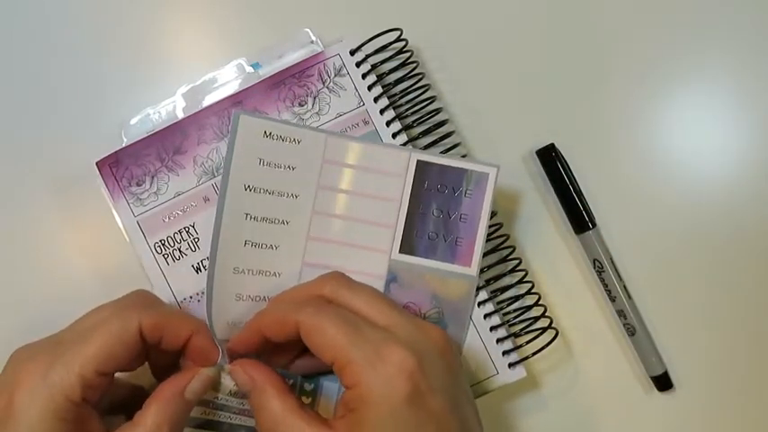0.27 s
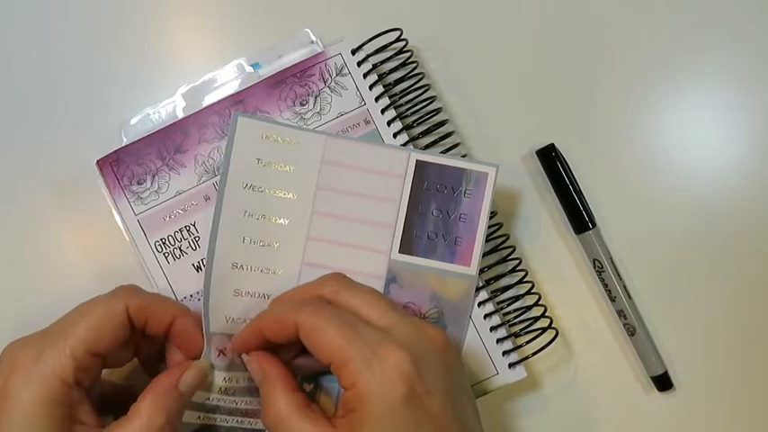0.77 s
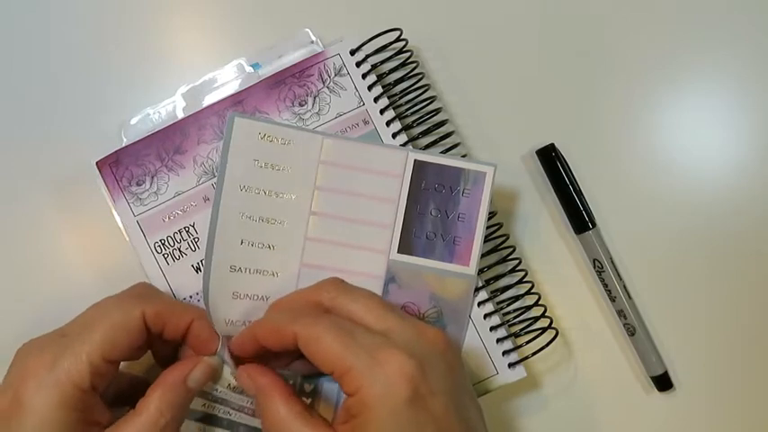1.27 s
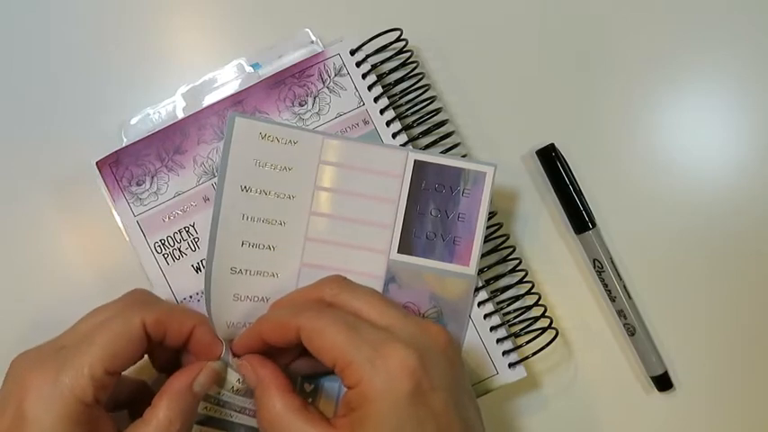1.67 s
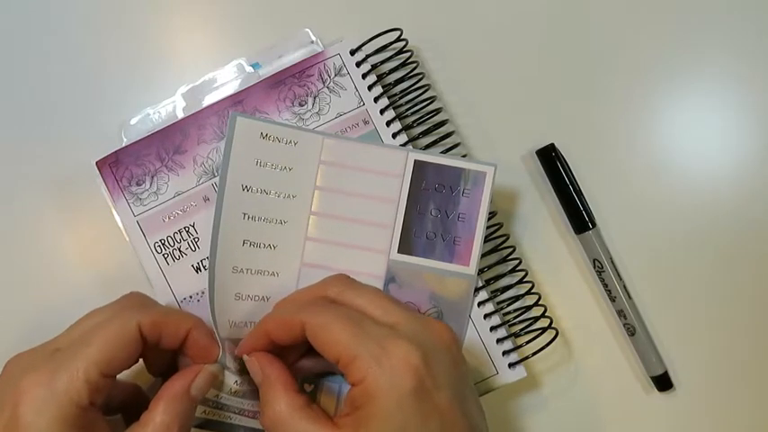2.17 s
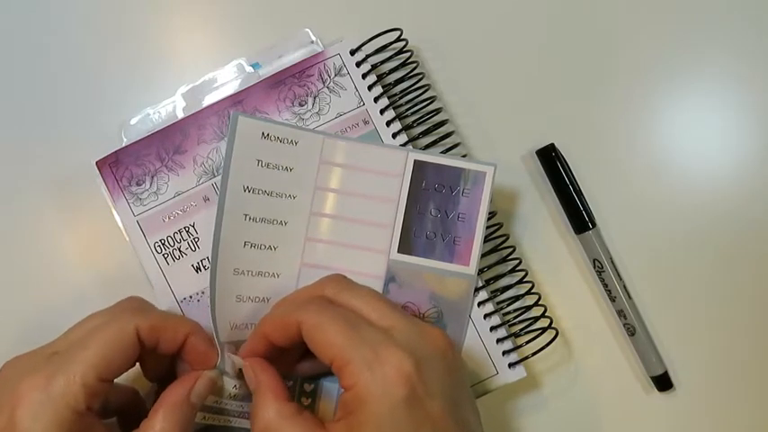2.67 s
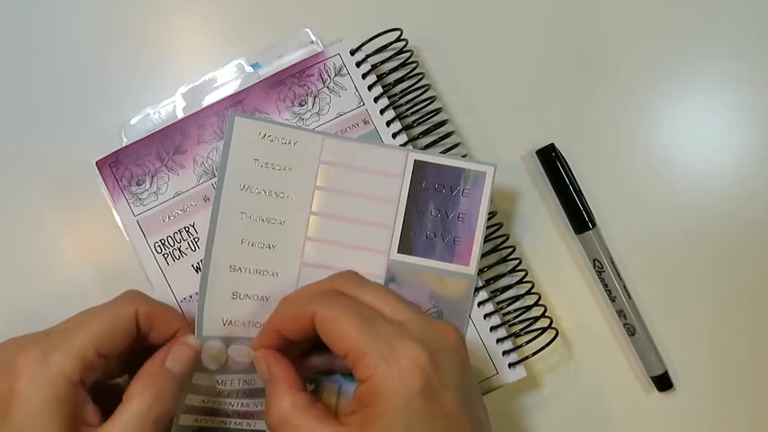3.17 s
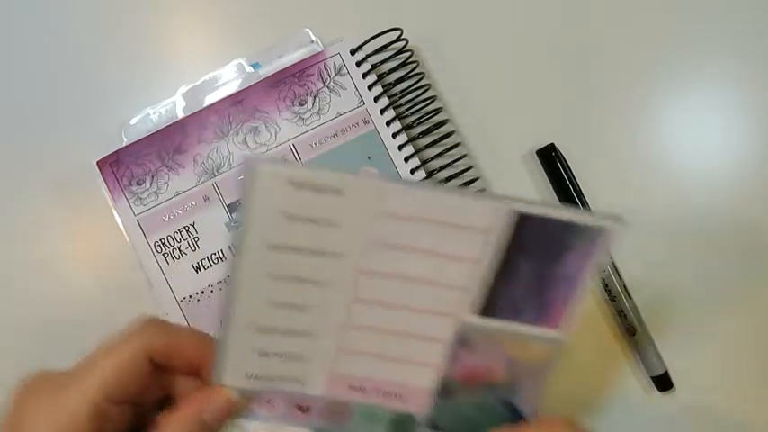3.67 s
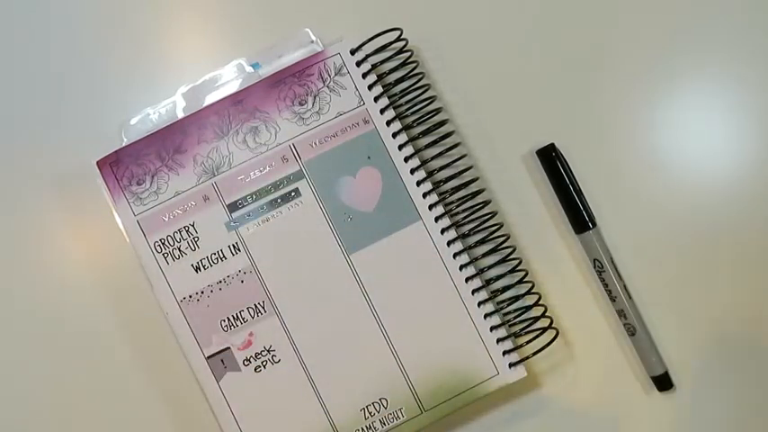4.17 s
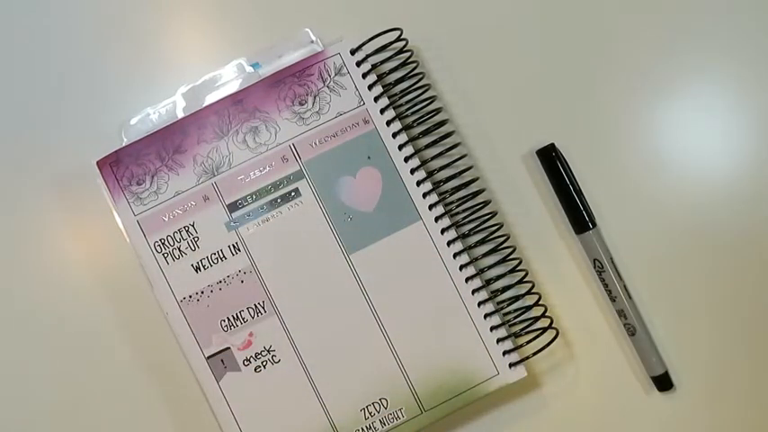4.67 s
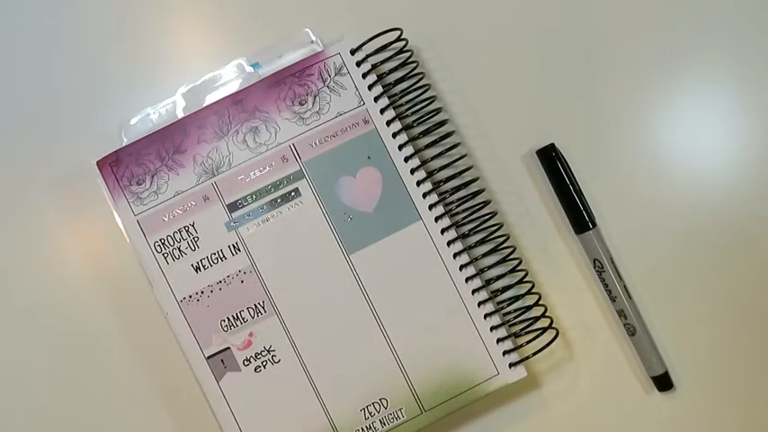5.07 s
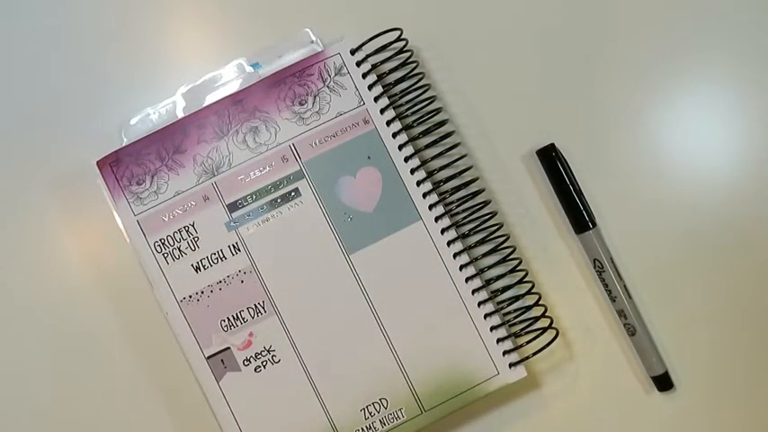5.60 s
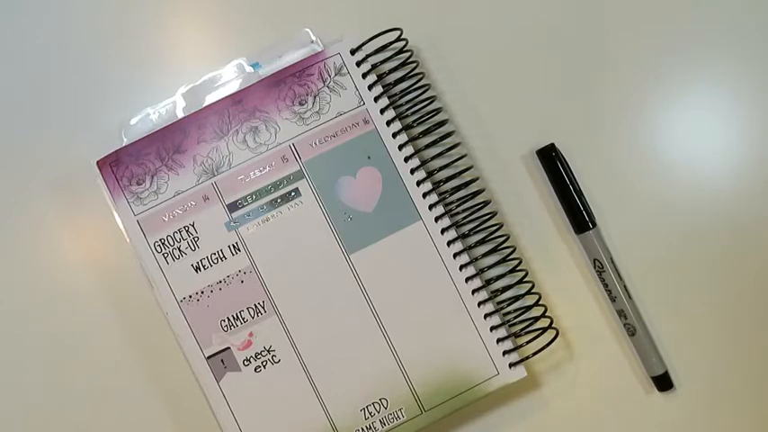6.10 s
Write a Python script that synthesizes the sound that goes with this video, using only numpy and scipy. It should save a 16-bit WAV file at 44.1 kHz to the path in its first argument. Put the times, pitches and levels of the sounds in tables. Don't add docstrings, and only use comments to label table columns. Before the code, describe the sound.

Sparse paper ticks and crisp snaps, the loudest near three seconds, then brief rustling, soft desk knocks, a faint chair groan and quiet room air.

```python
import sys
import numpy as np
from scipy import signal
from scipy.io import wavfile
from scipy.ndimage import uniform_filter1d

SR = 44100
rng = np.random.default_rng(int(sys.argv[2]) if len(sys.argv) > 2 else 0)


def put_to_file(sound):
    columns = np.atleast_2d(sound).T
    safe = np.clip(columns, -1, 1)
    whole_steps = np.round(safe * 32767)
    wavfile.write(sys.argv[1], SR, whole_steps.astype(np.int16))


def boost_factor(decibels):
    exponent = np.asarray(decibels, float) / 20
    return 10 ** exponent


N = 279638


# t/s, peak level/dB, patch f/Hz, body level/dB, crispness/dB
SNAPS = [(0.1141, -21, 2650, 3.5, -6), (0.3496, -25.5, 3270, -16, -7), (0.3519, -22, 3060, 10, -19),
         (1.601, -28, 2960, -1.5, -12), (1.6206, -27, 3250, -6, -2), (2.0088, -24, 2470, -3, 7.5),
         (2.034, -24.5, 4060, -1, 10), (2.172, -10.5, 3500, -20, 2), (2.1722, -9, 2380, 3.5, -17),
         (2.9206, -22.5, 2880, -5, 7), (2.9258, -20, 2730, -6, -7), (2.9295, -30, 3050, -12, -10),
         (2.935, -1.7, 2850, 0.5, -0.5), (3.686, -27, 2240, -10, -22)]
# f/Hz, width/Hz, level/dB
TAUT_BODY = [(743, 650, -8), (1366, 530, -1.5)]
# f [multiple of patch f], width [share of f], level/dB
TAUT_PATCH = [(1.01, 0.3, -0.6), (1.32, 0.23, -6.5), (1.72, 0.23, -11.5)]
# f/Hz, width/Hz, level/dB
TAUT_EDGE = [(6000, 1100, -16.5), (7450, 1450, -15.5), (11200, 2800, -26), (14000, 2400, -26)]


def snaps():
    out = np.zeros(N)
    t = np.arange(900) / SR
    thin = signal.butter(2, 250, "high", fs=SR)
    chance = rng.standard_normal((len(SNAPS), 900))
    for (s, db, hz, body_db, crisp_db), noise in zip(SNAPS, chance):
        release = (t == 0) + 0.11 * noise * np.exp(-t / 0.0012)
        body = boost_factor(body_db) * ring(release, TAUT_BODY)
        patch_modes = [(k * hz, share * k * hz, mode_db) for k, share, mode_db in TAUT_PATCH]
        patch = ring(release, patch_modes)
        edge = boost_factor(crisp_db) * ring(release, TAUT_EDGE)
        add(out, s, boost_factor(db) * peaked(signal.lfilter(*thin, body + patch - edge)))
    return out


# t/s, peak level/dB, ring f/Hz, snap level/dB, crispness/dB
PICK_TICKS = [(0.096, -40, 1060, -3, -21), (.1095, -35, 980, -12, -3), (0.3483, -35.5, 1800, 2.5, -4),
              (0.563, -33.5, 1250, 1.5, -3), (0.592, -39, 1230, 3, -24), (0.66, -36, 1800, -10, -14),
              (0.685, -26.5, 1450, -19, -40), (0.777, -42.5, 890, -14, -24), (0.826, -38, 1440, -16, -28),
              (0.861, -39, 1600, -2, -13), (0.928, -39.5, 1480, -12, -20), (1.064, -44, 1230, -16, -26),
              (1.315, -36, 885, -10, -28), (1.338, -37, 780, -9, -26), (1.769, -58, 1300, -6, 8),
              (1.945, -57, 935, -4, 7), (2.112, -38, 1320, -14, -20), (2.142, -27, 1400, -14, -19)]
# t/s, peak level/dB, ring f/Hz, snap level/dB, crispness/dB
PEEL_TICKS = [(2.466, -41, 1350, -13, -20), (2.53, -39.5, 1550, -10, -4), (2.585, -51, 1330, -9, 9),
              (2.596, -40.5, 1190, -7, 0), (2.639, -30.5, 1250, -12, -8), (2.728, -31, 1220, -5, -6),
              (2.75, -51, 1460, 2.5, 3), (2.774, -46.5, 1400, 3, 2), (2.811, -40, 1190, -6, 1),
              (2.823, -44, 1540, -1.5, 0.5), (2.836, -30.5, 1470, -10, -2.5), (2.846, -40, 1500, -10, -1)]
# t/s, peak level/dB, ring f/Hz, snap level/dB, crispness/dB
FLEX_TICKS = [(3.489, -19, 1070, -14, -18), (3.4904, -25, 1110, -34, -34), (3.515, -26, 950, -20, -40),
              (3.589, -32.5, 940, -25, -22), (3.612, -34.5, 970, -28, -34), (3.672, -34, 1030, -13, -18),
              (3.685, -28, 1490, -24, -38), (3.716, -37, 1090, -7, -28), (3.77, -46, 1010, -18, -28),
              (3.794, -29.5, 860, -32, -38), (3.7976, -40, 970, -28, -37), (3.801, -31, 850, -32, -37),
              (3.988, -43, 1300, -9, -17), (4.028, -40.5, 1030, -19, -22), (4.071, -29, 1110, -11, -29),
              (4.328, -30, 1450, -28, -38), (4.5, -41, 1090, -21, -18), (5.944, -59, 1560, -10, 10),
              (6.166, -36.5, 1390, -12, -24)]
GRIPS = [-10.5, -17, -13]
# f/Hz, width/Hz, level/dB
SHEET = [(2280, 480, 13), (2900, 2200, 2.5), (3640, 1200, 8.5), (4300, 840, -11), (4870, 660, 7)]
# f/Hz, width/Hz, level/dB
EDGE = [(5740, 310, 18), (7800, 3800, 16.5), (9300, 6400, 10.5), (14300, 3300, 9)]
FLAP_PER_DB, FLAP_PER_OCTAVE_DB = -0.46, -11


def ticks():
    out = np.zeros(N)
    t = np.arange(900) / SR
    tables = zip((PICK_TICKS, PEEL_TICKS, FLEX_TICKS), GRIPS)
    rows = [row + (grip,) for table, grip in tables for row in table]
    chance = rng.standard_normal((len(rows), 901))
    for (s, db, hz, snap_db, crisp_db, grip_db), (bend, *noise) in zip(rows, chance):
        flap_db = grip_db + FLAP_PER_DB * (db + 42) + FLAP_PER_OCTAVE_DB * np.log2(hz / 1200)
        slip = (t == 0) + 0.12 * np.array(noise) * np.exp(-t / 0.0011)
        body = peaked(steep(slip, hz, 0.54 * hz))
        flap = boost_factor(flap_db + 10.5) * peaked(steep(slip, 620, 690))
        snap = boost_factor(snap_db + 6.0) * peaked(ring(slip, SHEET, 1 + 0.074 * bend))
        crisp = boost_factor(crisp_db + 3.5) * peaked(ring(slip, EDGE))
        add(out, s + 0.0006, boost_factor(db - 0.44) * (body + flap + snap + crisp))
    return out


# t/s, length/s, level/dB, f/Hz
NAIL_SCRAPES = [(0, 0.012, -52, 2560), (.54, 0.033, -57, 2500), (0.561, 0.063, -50, 2470),
                (0.567, 0.11, -50.5, 1400), (0.586, 0.022, -49, 1710), (0.589, 0.019, -56, 4860),
                (0.709, 0.018, -48, 3000), (0.746, 0.019, -43.5, 1520), (0.748, 0.036, -46, 2680),
                (0.777, .02, -49.5, 744), (0.787, 0.018, -53, 2900), (1.318, 0.041, -50, 685),
                (1.593, 0.04, -49.5, 2950), (2.183, 0.053, -55, 3260), (2.456, 0.031, -57, 1500),
                (2.826, 0.036, -46, 3000), (2.832, 0.017, -44, 1410), (2.9206, 0.023, -34.5, 1300),
                (2.934, 0.04, -41.5, 900)]
# t/s, length/s, level/dB, f/Hz
FINGER_SCRAPES = [(3.046, 0.13, -54, 1460), (3.065, 0.11, -57.5, 3000), (3.218, 0.083, -53, 3000),
                  (3.352, 0.064, -54.5, 2180), (3.407, 0.013, -48, 2430), (3.479, 0.06, -47, 980),
                  (3.634, 0.048, -53.5, 3350), (3.675, 0.028, -40.5, 1070), (3.706, 0.024, -42.5, 1050),
                  (3.898, 0.032, -44.5, 2570), (3.897, 0.038, -46, 1040), (3.965, 0.047, -55, 1200),
                  (4.02, 0.045, -54, 1020), (4.27, 0.021, -54, 1020), (4.4, 0.015, -55, 1040),
                  (4.447, 0.024, -56, 2240), (4.492, 0.054, -57, 1560), (4.548, 0.019, -54, 2200)]
# width [share of f], crispness/dB
SCRAPE_COLOUR = [(.48, -28.5), (.65, -17)]


def scrapes():
    out = np.zeros(N)
    grains = grit(3.3)
    tables = zip((NAIL_SCRAPES, FINGER_SCRAPES), SCRAPE_COLOUR)
    rows = [row + colour for table, colour in tables for row in table]
    for s, length, db, hz, share, crisp_db in rows:
        burst = grains[round(s * SR):][:round(length * SR)]
        u = np.linspace(0, 1, len(burst))
        sheet = evened(steep(burst, hz, share * hz))
        edge = boost_factor(crisp_db) * evened(ring(burst, EDGE))
        add(out, s, boost_factor(db - 3.1 * u) * (sheet + edge) * signal.windows.tukey(len(u), 0.4))
    return out


# t/s, level/dB
RUB = [
    [(.45, -82), (.55, -63), (.7, -59.5), (.85, -62.5), (1.0, -83)],
    [(2.4, -76), (2.6, -66.5), (3.0, -67), (3.2, -61), (3.35, -63)],
    [(3.35, -64), (3.45, -55), (3.63, -59), (3.73, -54), (3.85, -66), (4.1, -59), (4.25, -84), (4.55, -62),
     (4.8, -86)],
]
# edge brightness/dB, flap body/dB
RUB_COLOUR = [(-25, 4), (-10, 1.5), (-7.5, 2)]


def rub():
    level_db, bright_db, body_db = np.full((3, N), -120.)
    for rows, colour in zip(RUB, RUB_COLOUR):
        s, db = np.transpose(rows)
        now = slice(round(s[0] * SR), min(round(s[-1] * SR), N))
        t = np.arange(N)[now] / SR
        level_db[now] = np.interp(t, s, db)
        bright_db[now], body_db[now] = colour
    grains = grit(1.8)
    clumps = boost_factor(3.6 * evened(uniform_filter1d(rng.standard_normal(N), 900)))
    sheet = evened(ring(grains, [(1400, 740, 10.1), (3000, 2300, 2.3), (5200, 1700, 2.9)]))
    edge = boost_factor(bright_db) * evened(ring(grains, EDGE))
    flap = boost_factor(body_db) * evened(steep(grains, 340, 1600))
    return boost_factor(level_db) * clumps * (sheet + edge + flap)


# t/s, peak level/dB, f/Hz
KNOCKS = [(0.115, -41.5, 202), (0.354, -40, 58), (0.781, -48, 90.5), (1.34, -47, 260), (2.934, -25.5, 463),
          (3.412, -40, 151), (3.434, -42, 107), (3.489, -29, 292), (3.517, -31.5, 345), (3.589, -40, 380),
          (3.692, -37, 366), (3.793, -26.5, 395), (3.803, -34.5, 116), (3.827, -40, 255),
          (3.871, -39.5, 170), (3.878, -44, 97), (4.528, -46, 206), (6.166, -48, 80), (6.167, -44, 210)]
KNOCK_CYCLES = 6.9


def knocks():
    out = np.zeros(N)
    t = np.arange(9000) / SR
    for s, db, hz in KNOCKS:
        decay = boost_factor(-60 * t * hz / KNOCK_CYCLES)
        push = 1 - np.exp(-t / 0.0014)
        add(out, s, boost_factor(db) * peaked(np.sin(2 * np.pi * hz * t) * decay * push))
    return out


# t/s, level/dB
GROAN = [(4.262, -73), (4.28, -51), (4.309, -61.5), (4.43, -63), (4.48, -58.5), (4.56, -62), (4.754, -61.5)]
GROAN_HZ = 465


def groan():
    s, db = np.transpose(GROAN)
    t = np.arange(s[0], s[-1], 1 / SR)
    waver, flutter = (evened(uniform_filter1d(row, 600)) for row in rng.standard_normal((2, len(t))))
    phase = 2 * np.pi * np.cumsum(GROAN_HZ * (1 + 0.0071 * waver)) / SR
    level = boost_factor(np.interp(t, s, db) + 10.0 + 0.98 * flutter) * signal.windows.tukey(len(t), 0.05)
    out = np.zeros((2, N))
    add(out[0], s[0], level * np.sin(phase))
    add(out[1], s[0], level * np.sin(phase + 1.6 + 1.1 * flutter))
    return out


# f/Hz, t60/s
ROOM = [(200, 0.088), (1000, 0.21), (3000, 0.15), (8000, 0.13), (14000, 0.083)]


def room(x):
    taps = np.zeros((2, SR // 2))
    starts = np.arange(150, SR // 2 - 20, 20)
    at = starts + rng.integers(0, 20, (2, len(starts)))
    np.put_along_axis(taps, at, rng.choice([-1., 1.], at.shape), 1)
    hz, t, z = signal.stft(taps, SR, nperseg=128)
    decay = boost_factor(-60 * t / read(ROOM, hz)[:, None])
    tail = signal.istft(z * decay, SR, nperseg=128)[1]
    tail[:, :150] = 0
    return signal.fftconvolve(x[None], tail / np.linalg.norm(tail[0]), axes=1)[:, :N]


# f/Hz, density level/dB
HUM = [(12, -42), (20, -21), (86, -4), (143, -6), (372, -6.5), (479, -6.5), (535, -2.5), (599, -9.5),
       (690, -6), (966, -11), (3420, -16), (11500, -30.5), (15200, -39.5), (16500, -53)]
# f/Hz, coherence [-1 to 1]
SAME = [(30, 0.85), (60, 1.0), (150, 0.5), (380, -0.21), (950, 0.21), (2380, 0.064), (5980, 0.31),
        (15000, -0.012)]
HUM_DB = -54


def hum():
    frames, hz = N // 256 + 5, np.fft.rfftfreq(1024, 1 / SR)
    a, b, c, d, patches = rng.standard_normal((frames, 513, 5)).T
    patches = evened(uniform_filter1d(uniform_filter1d(patches, 5, axis=0), 16, axis=1))
    patchy_db = read([(100, 1.0), (800, 0.79), (3000, 0.37)], hz)[:, None]
    same = np.clip(read(SAME, hz), -1, 1)[:, None]
    left = a + 1j * b
    right = same * left + np.sqrt(1 - same ** 2) * (c + 1j * d)
    top_db = read([(14600, -5), (15400, 0), (16000, -16)], hz)
    level_db = (read(HUM, hz) + top_db)[:, None] + patchy_db * patches
    z = np.array([left, right]) * boost_factor(level_db)
    noise = signal.istft(z, nperseg=1024, noverlap=768)[1][:, :N]
    return boost_factor(HUM_DB + 2.5) * evened(noise)


GRAINS_PER_S = 6000


def grit(spread_db):
    size = boost_factor(spread_db * np.minimum(rng.exponential(1, N), 5)) * rng.choice([-1., 1.], N)
    return size * (rng.random(N) < GRAINS_PER_S / SR)


def resonate(x, hz, width):
    turn = np.exp(2j * np.pi * np.cumsum(hz * np.ones(len(x))) / SR)
    r = np.exp(-np.pi * width / SR)
    return 2 * (turn * signal.lfilter([1 - r], [1, -r], x / turn + 1e-18)).real


def steep(x, hz, width):
    return resonate(resonate(x, hz, width), hz, width)


def ring(x, modes, bend=1):
    return sum((-1) ** k * boost_factor(db) * steep(x, hz * bend, width) for k, (hz, width, db) in enumerate(modes))


def evened(x):
    return x / np.sqrt(np.mean(x ** 2) + 1e-20)


def peaked(x):
    return x / (abs(x).max() + 1e-20)


def read(points, hz):
    f, value = np.transpose(points)
    return np.interp(np.log(hz + 1), np.log(f + 1), value)


def add(mix, s, sound):
    part = mix[max(round(s * SR), 0):][:len(sound)]
    part += sound[:len(part)]


TOP_HZ, PORT_LAG = 14500, 0.7


def scene():
    paper = snaps() + ticks() + scrapes() + rub()
    paper = signal.lfilter(*signal.butter(2, TOP_HZ, fs=SR), paper)
    lag = PORT_LAG / 2 * np.gradient(paper)
    pan_db = np.interp(np.arange(N) / SR, [3.3, 4.1, 5.5, 6.1], [-0.32, 0.19, -0.6, 0.2])
    direct = np.array([paper - lag, paper + lag]) * boost_factor([pan_db, -pan_db])
    echo = room(paper)
    echo = 0.64 * echo + 0.41 * echo[::-1]
    return direct + boost_factor(-11) * echo + knocks() + groan() + hum()


def top_cut(x):
    return signal.sosfilt(signal.butter(12, 16800, fs=SR, output="sos"), x)


def record(dry):
    limit = signal.firwin(255, 16300, window=("kaiser", 8), fs=SR)
    mix = signal.oaconvolve(dry, limit[None], "same") + 0.00029
    return top_cut(mix)


dry = scene()
out = record(dry)
put_to_file(out)
```